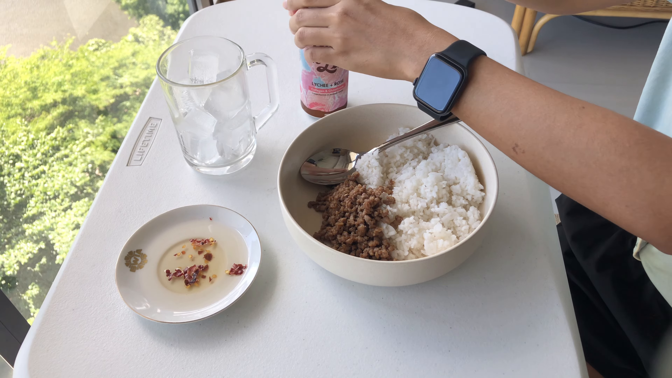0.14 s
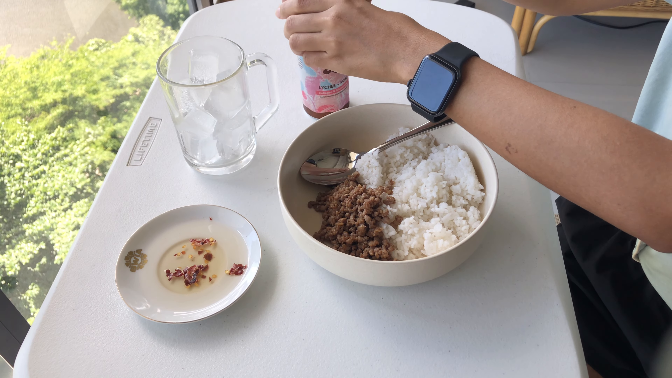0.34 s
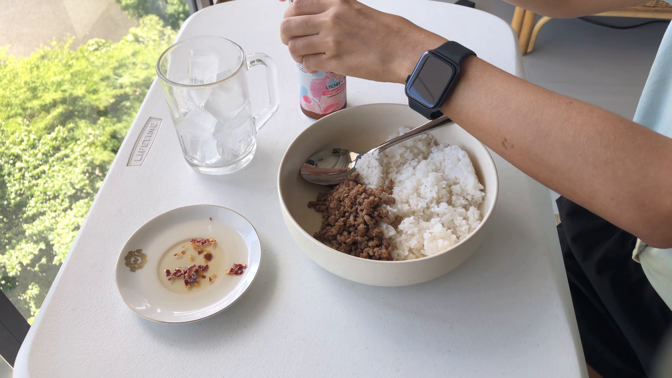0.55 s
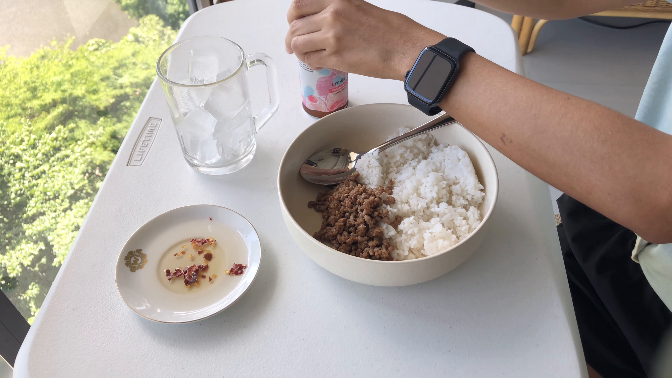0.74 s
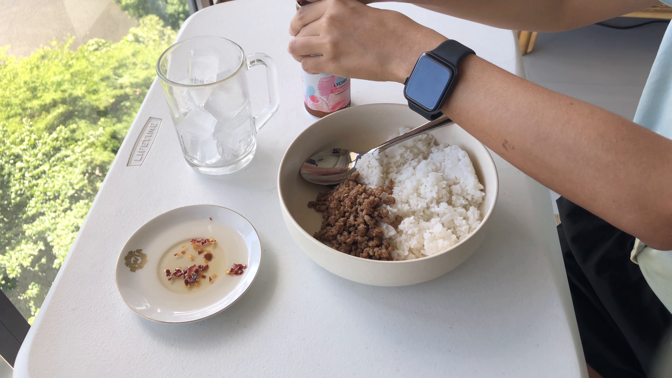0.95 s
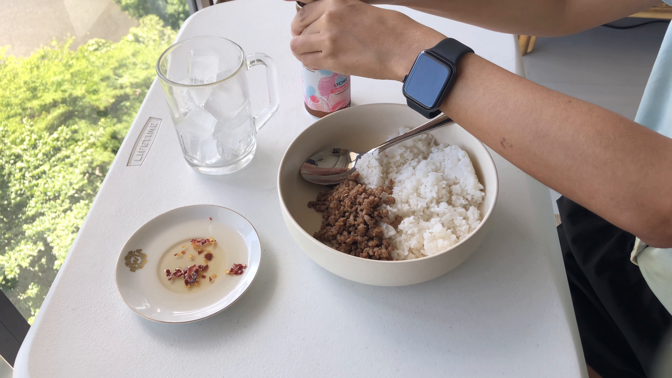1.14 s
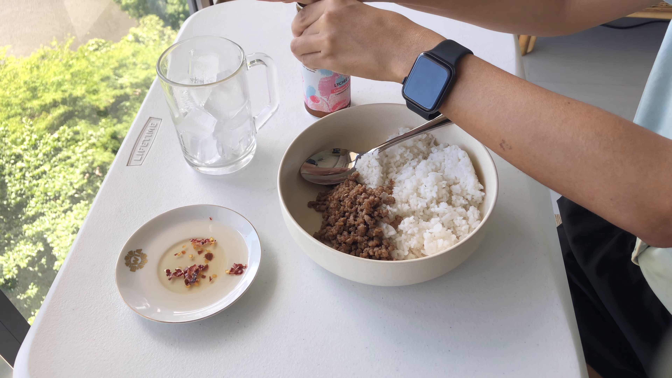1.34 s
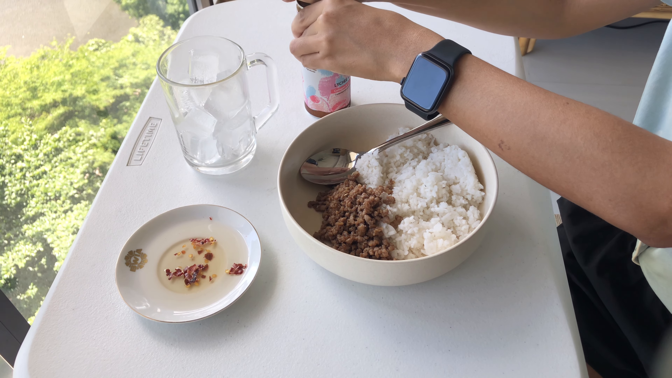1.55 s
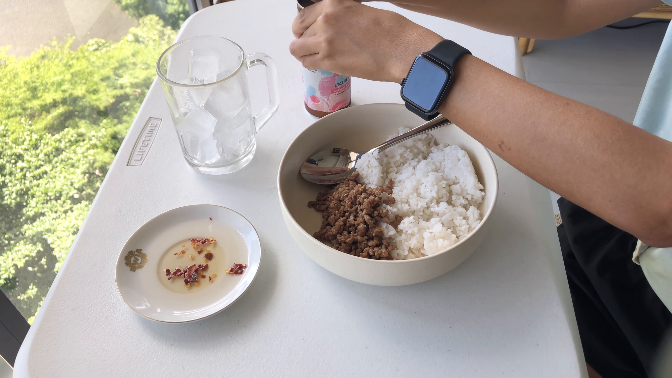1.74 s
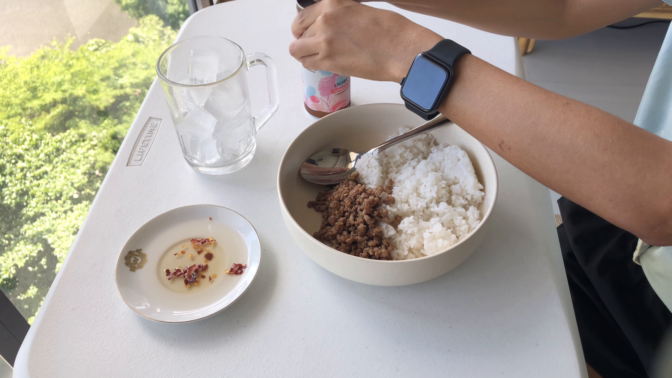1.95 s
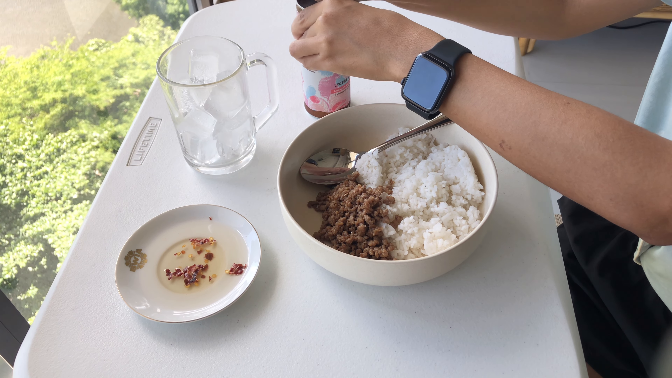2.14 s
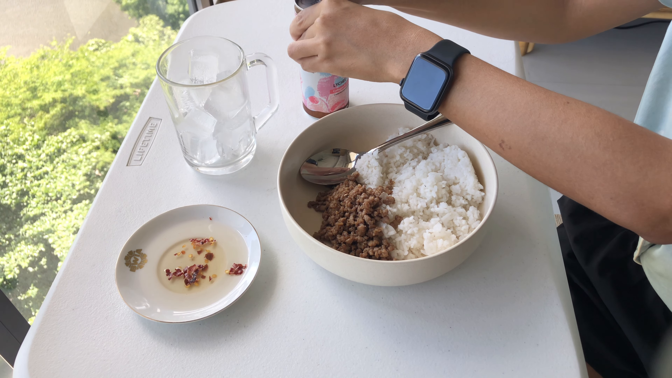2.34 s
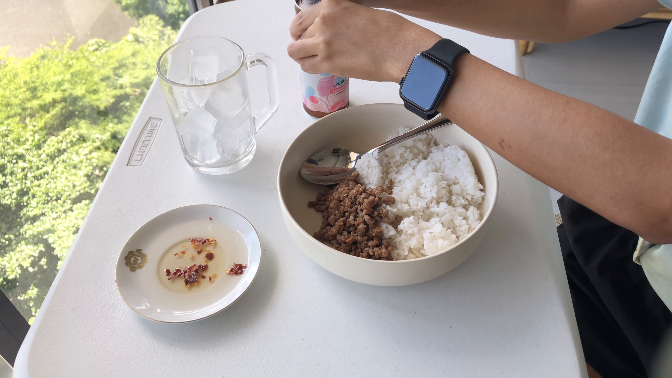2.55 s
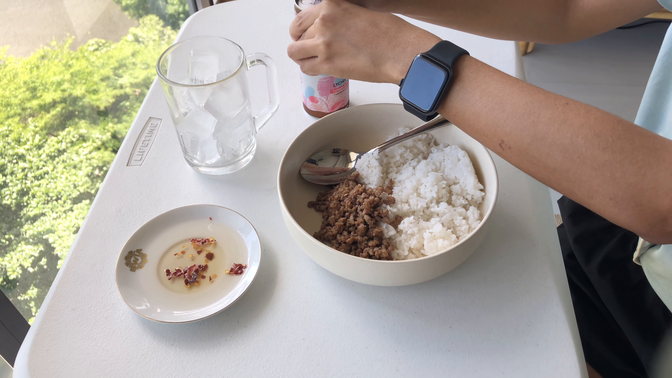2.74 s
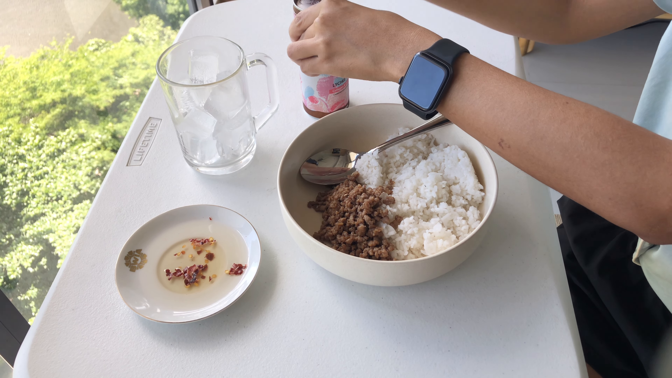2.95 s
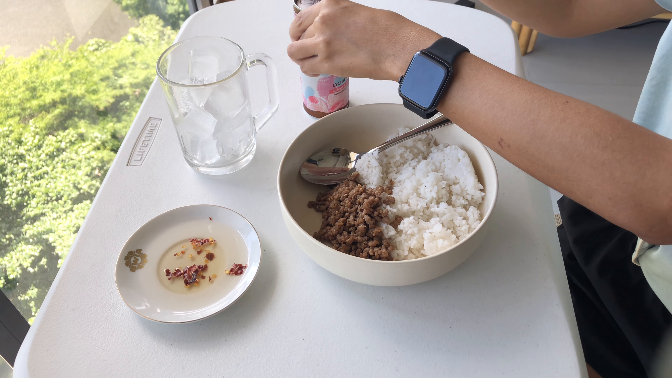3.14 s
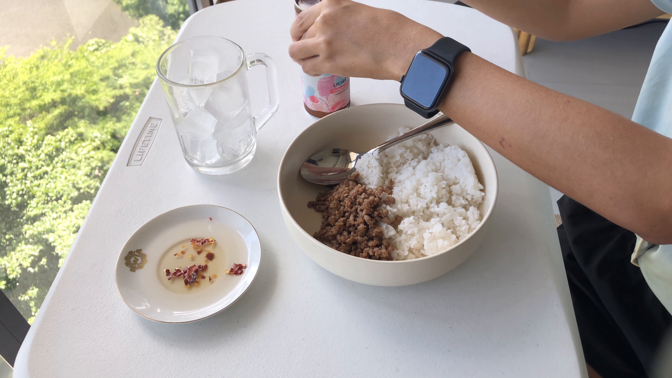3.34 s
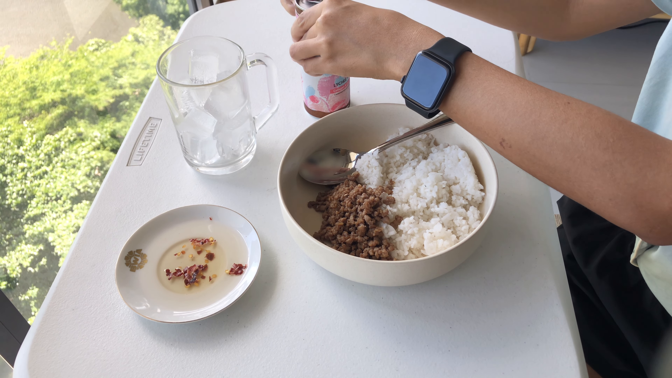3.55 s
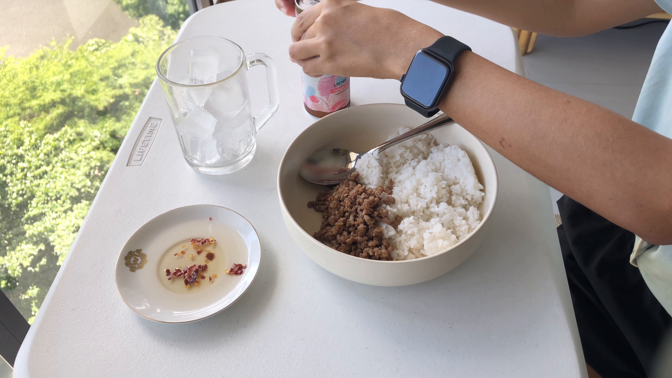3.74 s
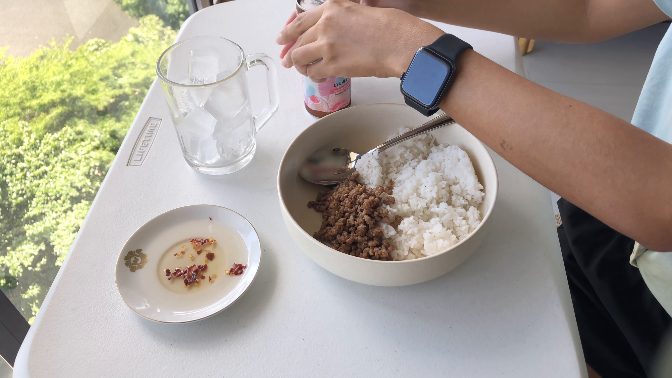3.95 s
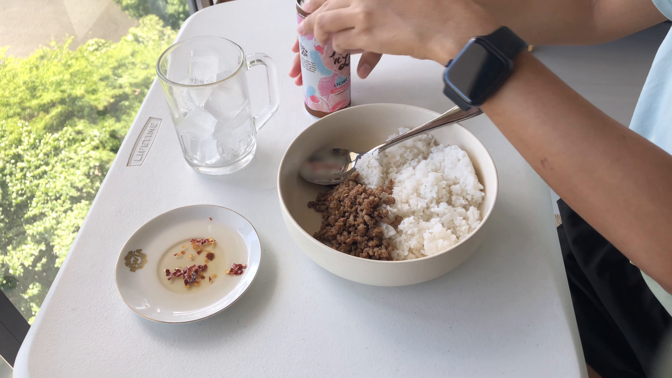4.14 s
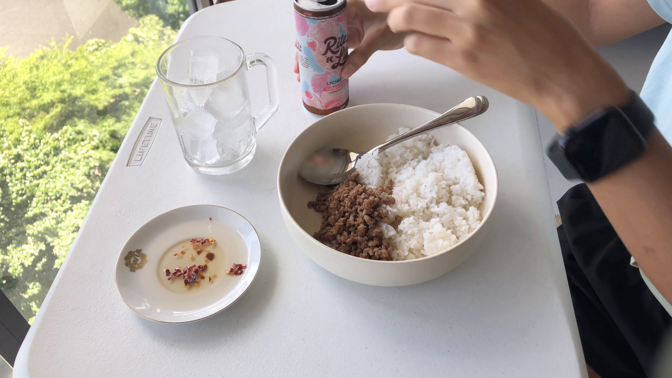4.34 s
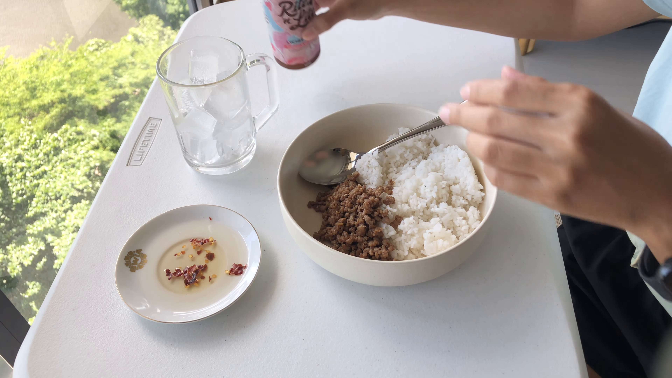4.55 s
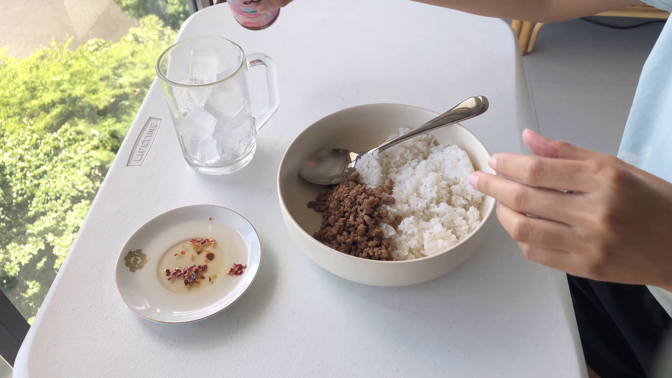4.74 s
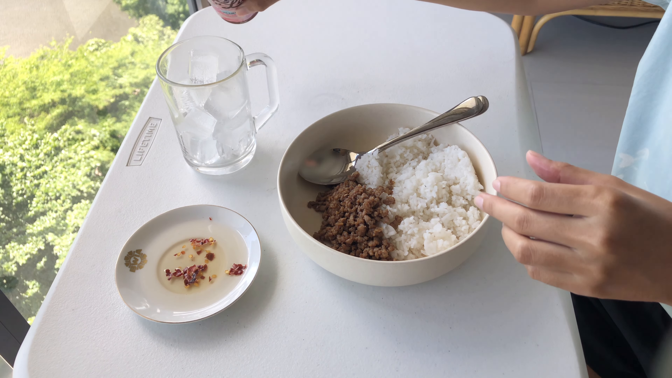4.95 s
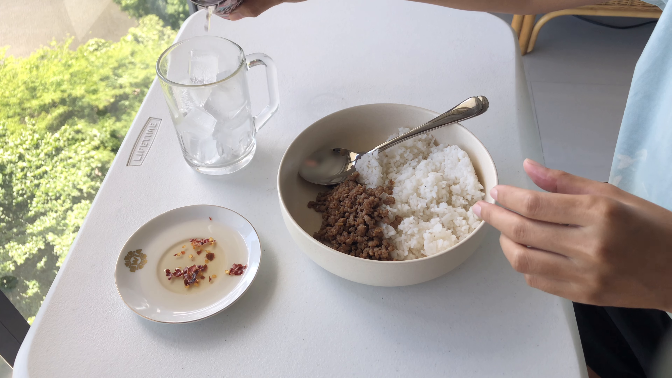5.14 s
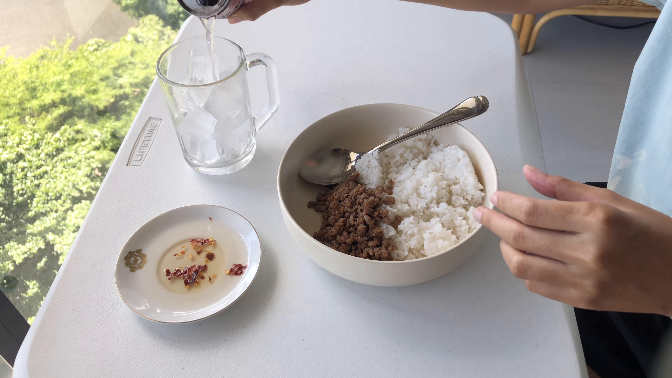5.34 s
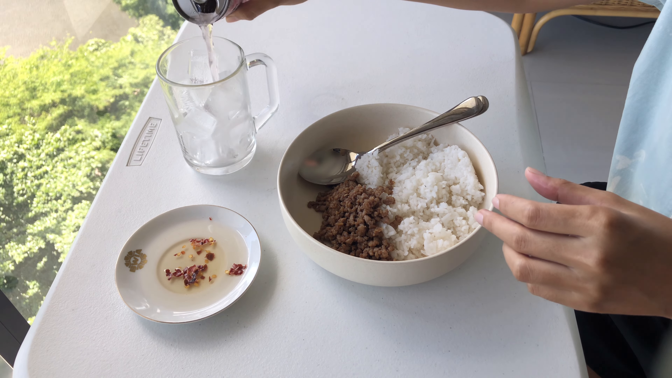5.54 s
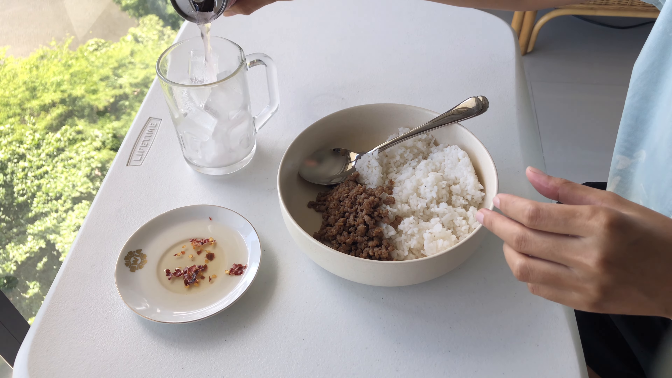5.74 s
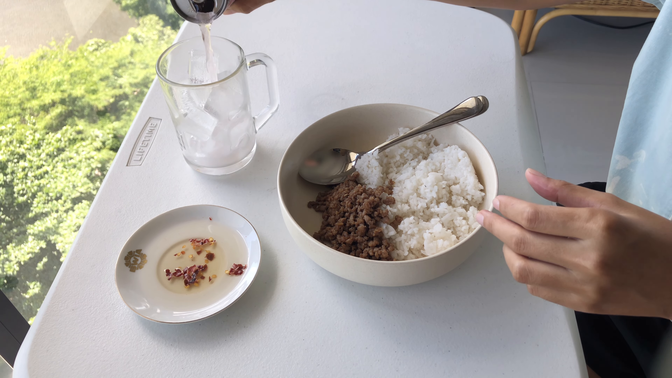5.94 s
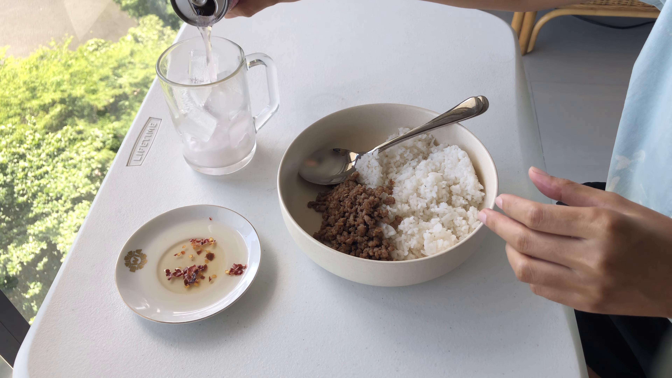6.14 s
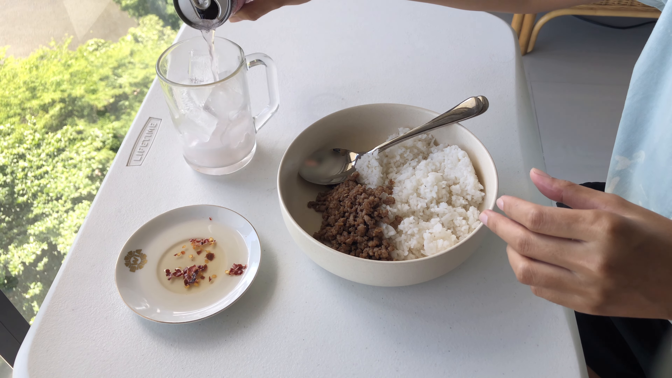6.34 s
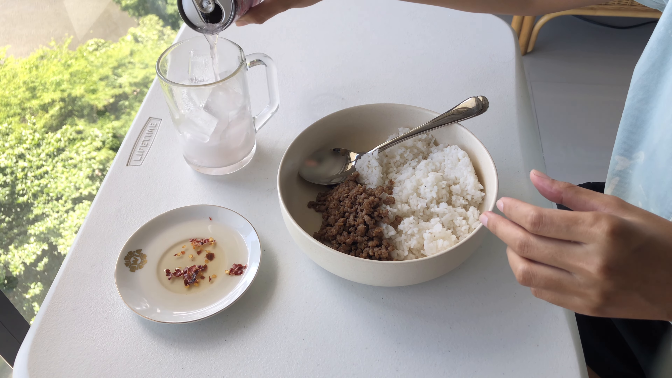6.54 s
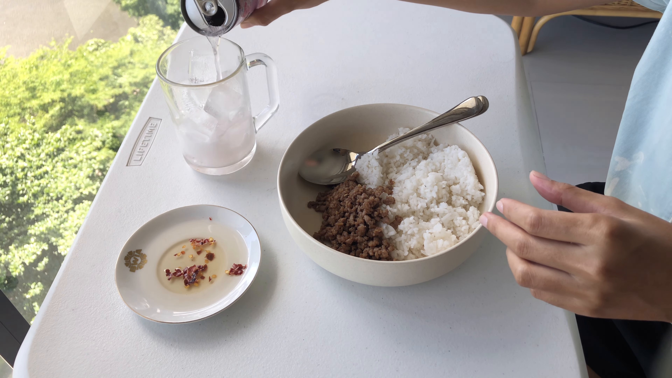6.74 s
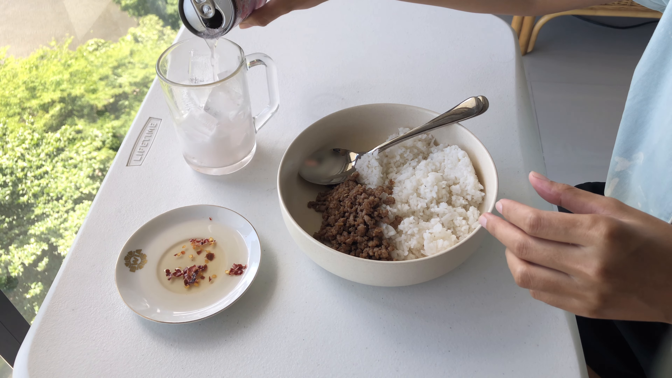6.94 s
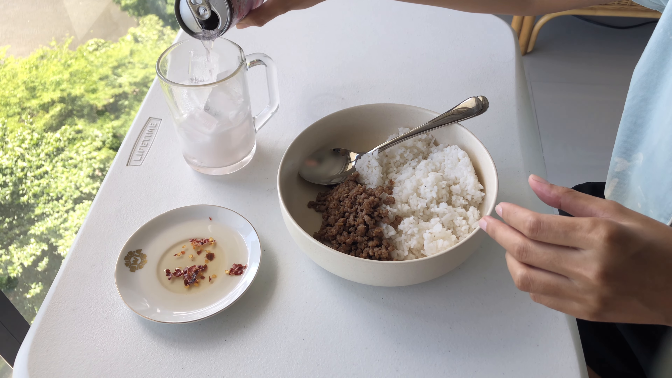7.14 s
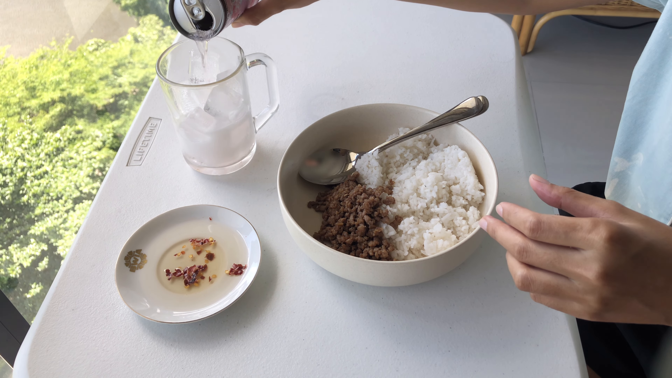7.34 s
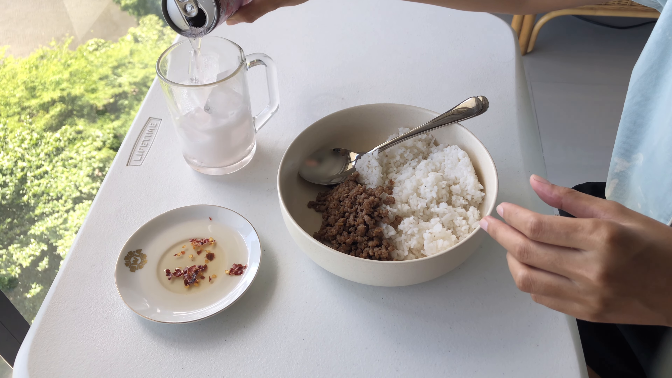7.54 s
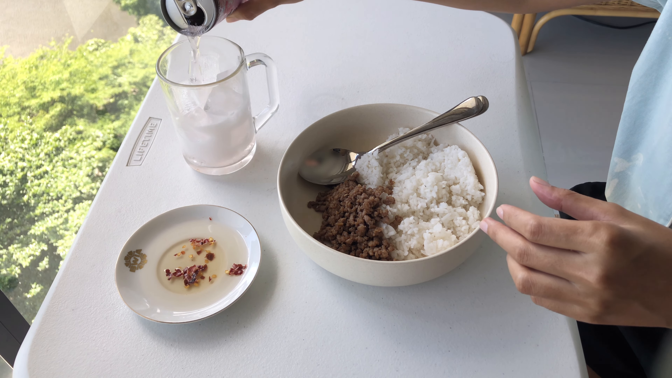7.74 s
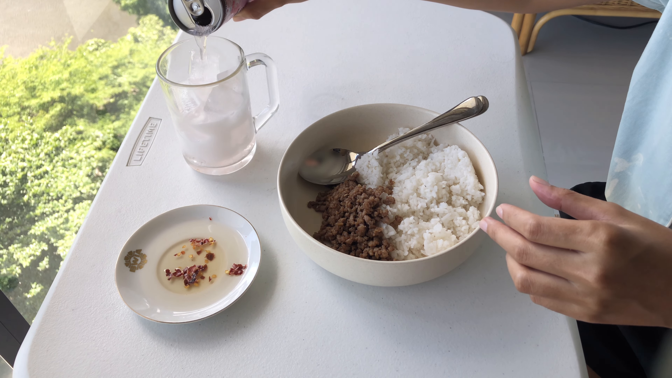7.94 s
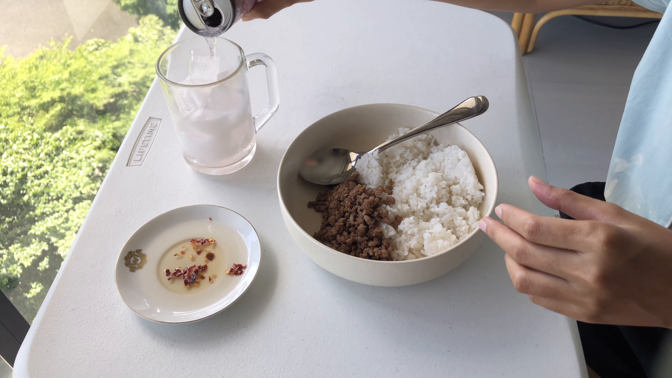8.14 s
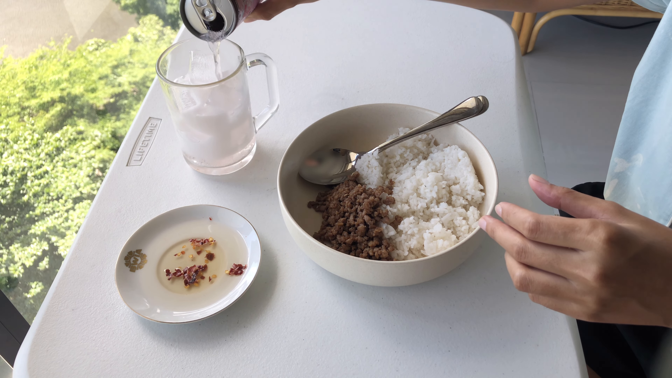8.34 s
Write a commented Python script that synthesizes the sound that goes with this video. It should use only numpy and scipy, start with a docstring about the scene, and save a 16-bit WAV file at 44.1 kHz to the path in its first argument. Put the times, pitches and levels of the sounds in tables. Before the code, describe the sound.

A drink can is cracked open with short hisses, then poured fizzing over ice in a glass mug, in a quiet room.

```python
"""A hard-walled room, close to a table: a drink can is nudged, cracked open and poured over ice in a mug.
The can knocks on the table top, its lid tears in cracks that ring the metal, and gas hisses through the slit.
Air gulps in, the loose tab twangs, ice snaps, and bubbles plop over a fine fizz coloured by the mug.
A fridge-like hum and far engines lie underneath. The sound is mono."""
import sys
import numpy as np
from scipy import signal
from scipy.fft import rfft, irfft
from scipy.io import wavfile
from scipy.ndimage import uniform_filter1d

SR = 44100
rng = np.random.default_rng(int(sys.argv[2]) if len(sys.argv) > 2 else 0)


def master_out(mix):
    """Clip the mix to full scale and print it as 16-bit PCM to the path in sys.argv[1]."""
    frames = np.transpose(np.atleast_2d(mix))
    ceiling = np.clip(frames, -1, 1)
    pcm = np.round(ceiling * 32767).astype(np.int16)
    wavfile.write(sys.argv[1], SR, pcm)


N = 370881
TIME_S = np.arange(N) / SR


def undb(db):
    return 10 ** (np.asarray(db) / 20)


def at_rms(x, db=0):
    return x * undb(db) / np.sqrt(np.mean(x ** 2))


def at_peak(x, db=0):
    return x * undb(db) / np.max(np.abs(x))


def add(track, start_s, sound):
    i = int(start_s * SR)
    track[i:i + len(sound)] += sound[:N - i]


def colour(x, spectrum, tilt_db=0):
    """Causal EQ through (freq_hz, gain_db) points, tilted by tilt_db per octave around 3 kHz."""
    octaves = np.log2(np.arange(1, 2050) * SR / 4096)
    hz, db = np.transpose(spectrum)
    gain_db = np.interp(octaves, np.log2(hz), db) + tilt_db * (octaves - np.log2(3000))
    cepstrum = irfft(gain_db * np.log(10) / 20)
    cepstrum[1:2048] *= 2  # fold to minimum phase
    cepstrum[2049:] = 0
    return signal.fftconvolve(x, irfft(np.exp(rfft(cepstrum))))[:len(x)]


def band(x, hz, width_hz, passes=1):
    for _ in range(passes):
        x = signal.lfilter(*signal.iirpeak(hz, hz / width_hz, fs=SR), x)
    return x


def ring(push, modes):
    """Decaying modes, their tuning and level a little different on each strike; peak 1."""
    out = 0
    for hz, db, t60_s in modes:
        db_offset, detune = rng.standard_normal(2) * (1.2, 0.012)
        radius = np.exp(-np.log(1000) / (t60_s * SR))
        angle = 2 * np.pi * hz * (1 + detune) / SR
        mode = signal.lfilter([1, 0, -1], [1, -2 * radius * np.cos(angle), radius ** 2], push)
        out = out + undb(db + db_offset) / np.sin(angle) * mode
    return at_peak(out)


def burst(decay_ms, length_s):
    """A dying puff of noise."""
    t = np.arange(int(length_s * SR)) / SR
    return rng.standard_normal(len(t)) * np.exp(-1000 * t / decay_ms)


def wander(rate_hz):
    """Smooth random drift with a spread of about 1."""
    hold = int(SR / rate_hz)
    steps = np.repeat(rng.standard_normal(N // hold + 1), hold)
    return 1.4 * uniform_filter1d(uniform_filter1d(steps, hold), hold)[:N]


# Room tone EQ: freq_hz, gain_db
HUSH_EQ = [(15, -57.5), (25, -29), (36, -13.5), (70, -6), (165, -8.5), (211, -21.5), (382, -20),
           (414, -21.5), (791, -32.5), (857, -32), (2590, -39), (5520, -42), (15800, -48)]
# Ride on its low mids: time_s, boost_db
HUSH_SWELL = [(0, 7.5), (4.3, 4), (5, 1), (8.41, 2)]
# Hum lines: pitch_hz, width_hz, rms_db
HUM_LINES = [(58.06, 7.9, -62.5), (79.4, 10, -69), (118.13, 5.6, -55), (140, 63, -65.5), (165.4, 28, -57.5)]


def room_tone():
    """A dark hush under narrow bands of noise that waver like a fridge's hum."""
    hush = at_rms(colour(rng.standard_normal(N), HUSH_EQ), -56.5)
    boost_db = np.interp(TIME_S, *np.transpose(HUSH_SWELL))
    out = hush + (undb(boost_db) - 1) * band(hush, 450, 980)
    for hz, width_hz, db in HUM_LINES:
        out += at_rms(band(rng.standard_normal(N), hz, width_hz, passes=2), db)
    return out


# Far engines, one list per run: time_s, firing_hz, level_db
ENGINE_RUNS = [
    [(0.0, 31.63, -44), (1.82, 30.8, -51), (2.4, 28.2, -47)],
    [(7.4, 24.6, -56), (8.062, 28.07, -51), (8.41, 27.9, -50)],
]
# Their harmonics: firing_multiple, gain_db
ENGINE_HARMONICS = [(3, -21.5), (4, -15.5), (5, 1), (6, -1)]


def far_engines():
    """Engines outside drone on harmonics of an unsteady firing rate."""
    out = np.zeros(N)
    for run in ENGINE_RUNS:
        times, rates, levels = np.transpose(run)
        running = 1. * (TIME_S >= times[0]) * (TIME_S <= times[-1])
        fade = uniform_filter1d(uniform_filter1d(running, 200), 8000)
        firing_hz = np.interp(TIME_S, times, rates) * (1 + 0.0073 * wander(9.4))
        phase = 2 * np.pi * np.cumsum(firing_hz) / SR
        db = np.interp(TIME_S, times, levels)
        for multiple, gain_db in ENGINE_HARMONICS:
            gain = fade * undb(db + gain_db + 2.8 * wander(4.8))
            out += gain * np.sin(multiple * phase + 6 * rng.random())
    return out


# The table top's low thud: pitch_hz, gain_db, t60_s
THUD_MODES = [(225, -2, 0.073), (363, 15.5, 0.066), (586, -23, .04), (800, -33.5, 0.03)]
# The hard edge of a knock: pitch_hz, gain_db, t60_s
CLACK_MODES = [(1080, -13.5, 0.023), (1600, 4.5, 0.0051), (2183, -1, 0.029), (3420, -26, 0.0067)]
# Can on table: start_s, level_db, hardness_db
CAN_KNOCKS = [(0.256, -25.5, -24), (0.316, -35, -22.5), (0.349, -23, -18), (0.389, -35, -20),
              (0.48, -46, -4), (0.548, -38.5, -15), (0.621, -44, -22), (0.679, -45, -10)]


def can_knocks():
    """The nudged can bumps the table: a soft push for the thud, a short rattle for the clack."""
    out = np.zeros(N)
    for start_s, db, hardness_db in CAN_KNOCKS:
        push = uniform_filter1d(np.abs(burst(0.31, .25)), 20)
        thud = ring(push, THUD_MODES)
        clack = ring(burst(9.9, .25), CLACK_MODES)
        add(out, start_s, undb(db) * (thud + undb(hardness_db) * clack))
    return out


# The can's metal ring in three rising ranges: pitch_hz, gain_db, t60_s
CAN_MODES = [
    [(3140, -15, 0.0055), (3840, -8.5, 0.0097), (4066, 3, 0.026), (4340, 4.5, 0.018), (4580, 1.5, .012),
     (4980, -4, 0.008)],
    [(5600, -1, 0.019), (6320, -1, 0.017), (6720, 3.5, .006), (7300, -5, 0.005)],
    [(8580, -7.5, 0.0012), (9950, 4.5, 0.0035), (11600, -5.5, 0.0048), (14500, -6.5, 0.0011)],
]
# Edges of each range: low_hz, high_hz
CAN_RANGES = [(3100, 5200), (5200, 8300), (8300, 16500)]
# Raw crunch against the ring in each range: gain_db
CAN_CRUNCH = [-5.5, -1.5, 2]
# Lid and tab cracks: start_s, peak_db, lid_pitch_hz, lid_gain_db, brightness_db
LID_CRACKS = [(0.5123, -37.5, 1120, 5.5, 0.5), (0.812, -41, 2325, 0, -1), (0.912, -45.5, 2255, 9, -1.5),
              (0.9844, -43, 2410, 1.5, 2.5), (1.34, -51.5, 2120, -15.5, 4.5),
              (1.3631, -5.5, 2120, -14, 4.5), (1.6788, 5, 1670, -6.5, -10.5), (1.8264, -11, 1670, -2.5, -6),
              (1.8947, -31.5, 1830, 1, -0.5), (1.9031, -1.5, 1690, -15.5, 5),
              (2.063, -34.5, 2400, -2.5, -4), (2.0991, -12.5, 1640, -14, 6.5),
              (2.132, -32, 3510, -4.5, 6.5), (2.145, -35, 3288, 3, -4), (2.2015, -32, 1660, -11.5, 1),
              (2.2087, -7, 1660, -14.5, 4.5), (2.218, -4, 2070, -3, -5), (2.2196, 9.5, 1649, -7.5, 1.5),
              (2.8374, -35, 2000, 9.5, 2.5), (2.8654, -32, 2030, -2, 2.5), (2.8749, -31, 3190, 8, 4),
              (3.012, -46, 2400, -11, 12), (3.3075, -18.5, 1290, -7.5, -4.5), (3.582, -43.5, 1318, 5, 0)]


def lid_cracks(lid_t60_s=0.011):
    """Each tear sounds the lid's raspy note and sets the can ringing, with raw crunch on top."""
    out = np.zeros(N)
    for start_s, db, lid_hz, lid_db, bright_db in LID_CRACKS:
        tear = .12 * burst(1.5, .05)
        tear[0] = 1  # the opening click
        note = ring(tear, [(lid_hz, 0, lid_t60_s), (lid_hz, -7, lid_t60_s / 3)])
        rasp = at_peak(band(tear, 1.1 * lid_hz, 1100, passes=2))
        crack = undb(lid_db) * (band(note, 1.1 * lid_hz, 0.5 * lid_hz) + rasp)
        tilt = (-bright_db, 0, bright_db)
        for range_db, modes, edges_hz, crunch_db in zip(tilt, CAN_MODES, CAN_RANGES, CAN_CRUNCH):
            bandpass = signal.butter(2, edges_hz, "band", fs=SR, output="sos")
            crunch = at_peak(signal.sosfilt(bandpass, tear), crunch_db)
            crack += undb(range_db) * signal.sosfilt(bandpass, ring(tear, modes) + crunch)
        add(out, start_s, at_peak(crack, db))
    return out


# EQ of a snap's click: freq_hz, gain_db
SNAP_EQ = [(150, -56), (330, 12), (600, 2.5), (830, 10), (1100, 5.5), (1600, 5), (3550, 4), (7000, -5),
           (9000, -12.5), (12000, -10), (15800, -19)]
# Its hollow body: pitch_hz, gain_db, t60_s
SNAP_BODY_MODES = [(294, -3.5, 0.026), (475, 1, 0.028), (856, 3, 0.053), (1343, 2, .03), (1600, 2, 0.032),
                   (2470, -2.5, 0.021)]
# Its bright ping: pitch_hz, gain_db, t60_s
SNAP_PING_MODES = [(3280, 2, 0.0055), (3800, 0, 0.015)]
# Snaps: start_s, level_db, tilt_db_per_octave, send_db, body_db
SHARP_SNAPS = [(1.072, -40.5, -1, 8.5, -32), (3.055, -19, 3.5, 8.5, -28), (3.938, -17.5, 5, 11, -26),
               (4.604, -30, 3.5, 14.5, -22), (4.61, -20.5, 4, 12, -21), (5.481, -39.5, 7, 1.5, -30),
               (5.597, -46, 5, -0.5, -25), (8.237, -22.5, 3.5, 17, -20)]


def snaps():
    """Ice, or something further off, snaps over a hollow body; returns direct sound and room send."""
    direct, send = np.zeros((2, N))
    for start_s, db, tilt_db, send_db, body_db in SHARP_SNAPS:
        jolt = .08 * burst(0.4, 0.12)
        jolt[0] = 1
        click = at_peak(colour(jolt, SNAP_EQ, tilt_db))
        snap = undb(db) * (click + undb(body_db) * ring(jolt, SNAP_BODY_MODES))
        ping = undb(db - 7) * ring(jolt, SNAP_PING_MODES)
        add(direct, start_s, snap + ping)
        add(send, start_s, undb(send_db) * snap)
    return direct, send


# EQ of the gas jet: freq_hz, gain_db
JET_EQ = [(300, -37), (1200, -29), (3000, -35.5), (5000, -17), (6000, -11.5), (8500, -6.5), (11500, -0.5),
          (14500, 2.5), (16500, -1.5)]
# Resonances of the can's mouth: pitch_hz, width_hz, gain_db
MOUTH_BANDS = [(2084, 950, -19), (4140, 1300, -10), (7460, 1500, -7.5)]
# Spurts of gas: start_s, hold_s, level_db, fade_db_per_s, mouth_db
GAS_SPURTS = [(1.353, .003, -34.5, 300, 1), (1.403, .235, -18.5, 799.5, -8), (1.665, .003, -39, 167, 11),
              (1.9, .003, -40, 144, -5.5), (2.081, .003, -47.5, 77, 8)]


def gas_hiss(rise_s=0.023):
    """A jet sputters through the slit and the can's mouth sings under it; spurts rise, hold and fade."""
    jet_gain, mouth_gain = np.zeros((2, N))
    for start_s, hold_s, db, fade_db_per_s, mouth_db in GAS_SPURTS:
        age_s = TIME_S - start_s
        attack = np.clip(age_s / rise_s, 0, 1) ** 2
        spurt = attack * undb(db - fade_db_per_s * np.maximum(age_s - rise_s - hold_s, 0))
        jet_gain += spurt
        mouth_gain += undb(mouth_db) * spurt
    sputter = rng.standard_normal(N) * undb(1.4 * wander(82))
    jet = at_rms(colour(sputter, JET_EQ))
    mouth = sum(at_rms(band(sputter[::-1], hz, width, passes=2), db) for hz, width, db in MOUTH_BANDS)
    return jet_gain * jet + mouth_gain * mouth


# The opening pop: start_s, peak_db, modes (pitch_hz, gain_db, t60_s)
AIR_GULP = (2.2195, -12, [(436, -13, 0.023), (782, 6.5, 0.011), (1138, -1, 0.012), (1440, -3.5, 0.0064)])


def air_gulp():
    """Air gulps into the open can with one hollow pop."""
    out = np.zeros(N)
    start_s, db, modes = AIR_GULP
    add(out, start_s, undb(db) * ring(np.abs(burst(0.19, 0.055)), modes))
    return out


# Twangs of the tab: start_s, peak_db, pitch_hz
TAB_TWANGS = [(2.8369, -42.5, 1060), (2.8655, -35.5, 1130), (2.878, -39, 1220), (2.973, -56, 1150),
              (3.275, -48, 1290), (3.3944, -48, 1372)]


def tab_twangs(t60_s=0.029):
    """The loose tab vibrates briefly on a single note."""
    out = np.zeros(N)
    for start_s, db, hz in TAB_TWANGS:
        add(out, start_s, undb(db) * ring(burst(5.2, .15), [(hz, 0, t60_s)]))
    return out


# EQ of the foam: freq_hz, gain_db
FOAM_EQ = [(290, -7), (500, -7), (749, -3), (1860, -4.5), (2180, -6.5), (2380, -1.5), (2670, -14),
           (3130, 2), (6000, -3.5), (14900, -7.5), (15800, -36)]
# The mug's resonances: pitch_hz, width_hz, boost_db
MUG_BANDS = [(1880, 560, 8), (2470, 60, 10), (5970, 2100, 9.5), (9800, 1430, 10.5), (15140, 2360, 13)]
# A thin note of the mug that swells and goes: centre_s, half_length_s, pitch_hz, width_hz, gain_db
MUG_NOTE = (7.214, 0.335, 2450, 150, 2.8)


def fizz(pour_s=5.28, build_s=0.14, pops_per_s=6000):
    """Thousands of tiny bubbles of uneven size burst over a soft hiss, coloured by the mug."""
    pops = (rng.random(N) < pops_per_s / SR) * rng.standard_normal(N)
    pops *= undb(1.7 * rng.exponential(size=N))
    foam = colour(at_rms(pops) + rng.standard_normal(N), FOAM_EQ)
    foam += sum((undb(db) - 1) * band(foam, hz, width) for hz, width, db in MUG_BANDS)
    centre_s, half_length_s, hz, width, db = MUG_NOTE
    swell = np.exp(-((TIME_S - centre_s) / half_length_s) ** 2)
    foam += undb(db) * swell * band(foam, hz, width)
    foam = at_rms(foam) * undb(wander(16))
    age_s = np.maximum(TIME_S - pour_s, 0)
    mid_db = -4.5 + 4 * age_s  # the mids grow as the mug fills
    foam += (undb(mid_db) - 1) * band(foam, 2160, 2800)
    build_db = -60 - 17.5 * np.exp(-age_s / build_s)
    return (age_s > 0) * undb(build_db) * foam


def plop(hz, t60_cycles):
    """A bubble's note climbs as it nears the surface; a splash around the same pitch starts it."""
    t = np.arange(int(.06 * SR)) / SR
    envelope = undb(-60 * t * hz / t60_cycles) * (1 - np.exp(-t / 0.00033))
    note = envelope * np.sin(2 * np.pi * hz * t * (1 + 2 * t))
    splash = band(burst(1, .06), hz, min(.5 * hz, 2000), passes=2)
    return note + at_peak(splash, -5)


# Foreground bubbles and ice ticks in the mug: start_s, level_db, pitch_hz
MUG_PLOPS = [(5.365, -50, 1590), (5.389, -44.5, 7030), (5.481, -44, 3360), (5.589, -46.5, 2360),
             (5.599, -36, 3270), (5.628, -43, 2335), (5.656, -48, 1800), (5.616, -45.5, 1080),
             (5.644, -38, 9940), (5.654, -48, 738), (5.739, -40, 1880), (5.778, -49, 2290),
             (5.803, -45, 2370), (5.967, -43.5, 1960), (5.978, -43.5, 2300), (5.999, -43, 4300),
             (6.008, -42.5, 5100), (6.043, -41.5, 853), (6.148, -52, 850), (6.164, -33, 8800),
             (6.213, -44, 5000), (6.312, -38, 7300), (6.332, -39, 5660), (6.364, -36.5, 6000),
             (6.429, -26.5, 1870), (6.81, -40, 6950), (6.992, -42, 1800), (7.014, -44, 1890),
             (7.198, -46.5, 1470), (7.35, -43, 1970)]


def pour_bubbles():
    """The drink bubbles as it runs over the ice; returns direct sound and room send."""
    direct, send = np.zeros((2, N))

    def bubble(start_s, db, hz, t60_cycles, send_db):
        sound = undb(db) * plop(hz, t60_cycles)
        add(direct, start_s, sound)
        add(send, start_s, undb(send_db) * sound)

    for start_s, db, hz in MUG_PLOPS:
        bubble(start_s, db, hz, t60_cycles=32, send_db=-7.5)
    for when, pitch, loudness in rng.random((45, 3)):  # the first gurgle down between the cubes
        bubble(5.5 + 0.91 * when, -60 + 6.7 * loudness, 600 * 5.5 ** pitch, t60_cycles=15.5, send_db=-4)
    for when, pitch, loudness in rng.random((90, 3)):  # smaller bubbles all through the pour
        bubble(5.4 + 3 * when, -55 + 7 * loudness, 2000 * 6 ** pitch, t60_cycles=16, send_db=-7)
    return direct, send


# Reverb time of the room: freq_hz, t60_s
ROOM_DECAY = [(300, 0.49), (1500, 0.608), (4500, 0.58), (7000, .49), (10000, 0.49), (15000, 0.15)]


def room(send, wall_ms=12.5, wall_db=5, early_db=-7):
    """Hard walls: the nearest answer together in a slap, then dense echoes fade, fastest in the treble."""
    t = np.arange(int(.9 * SR)) / SR
    freqs, t60s = np.transpose(ROOM_DECAY)
    tail = np.zeros(len(t))
    for hz in 125 * 2 ** np.arange(0, 7.1, .5):
        half_octave = signal.butter(2, [hz * 2 ** -.25, hz * 2 ** .25], "band", fs=SR, output="sos")
        t60_s = np.interp(np.log(hz), np.log(freqs), t60s)
        tail += signal.sosfilt(half_octave, rng.standard_normal(len(t))) * undb(-60 * t / t60_s)
    tail *= 1 - .5 * np.exp(-(t / 0.0013) ** 2)  # few echoes at first
    late_ms = 1000 * t - wall_ms
    tail *= undb(np.where(late_ms < 0, early_db, wall_db * np.exp(-late_ms / 7.5)))
    spectrum = rfft(tail, 65536)
    power = np.abs(spectrum) ** 2 + 1e-9
    flatten = np.sqrt(uniform_filter1d(power, 2000) / uniform_filter1d(power, 200))
    tail = irfft(spectrum * flatten)[:len(t)]  # no pitch stands far above its neighbours
    return signal.fftconvolve(send, tail / np.sqrt(np.sum(tail ** 2)))[:N]


def scene():
    """Can and mug feed the room; the snaps get a reverb of their own and the background stays dry."""
    background = room_tone() + far_engines()
    direct, send = pour_bubbles()
    for track, send_db in [(can_knocks(), 0.62), (lid_cracks(), -4.5), (gas_hiss(), -9),
                           (air_gulp(), 1.8), (tab_twangs(), -3.5), (fizz(), -7.5)]:
        direct += track
        send += undb(send_db) * track
    snap_direct, snap_send = snaps()
    mono = background + direct + room(send) + snap_direct + room(snap_send, early_db=0.5)
    return np.array([mono, mono])


def record(dry):
    """The microphone drops the deepest bass, the loudest cracks clip and the top is cut."""
    low_cut = signal.butter(6, 44, "high", fs=SR, output="sos")
    high_cut = signal.ellip(10, .2, 60, 15800, fs=SR, output="sos")
    clipped = np.clip(signal.sosfilt(low_cut, dry), -.9, .9)
    return signal.sosfilt(high_cut, clipped)


dry = scene()
out = record(dry)
master_out(out)
```